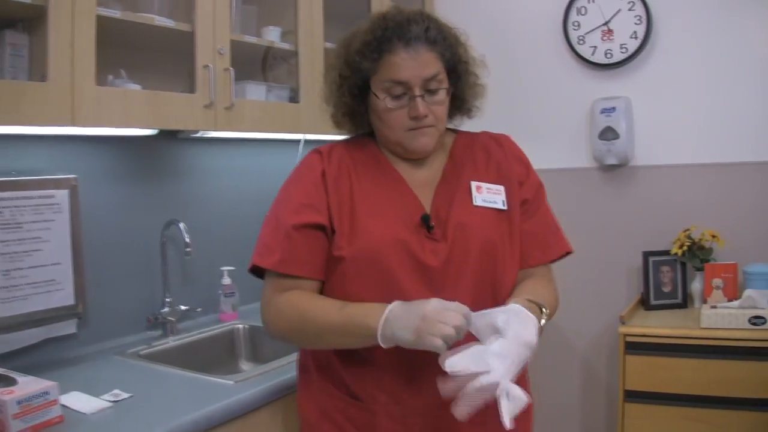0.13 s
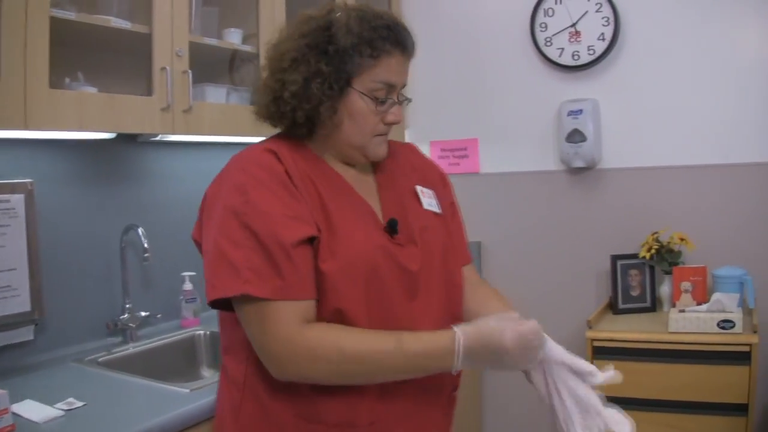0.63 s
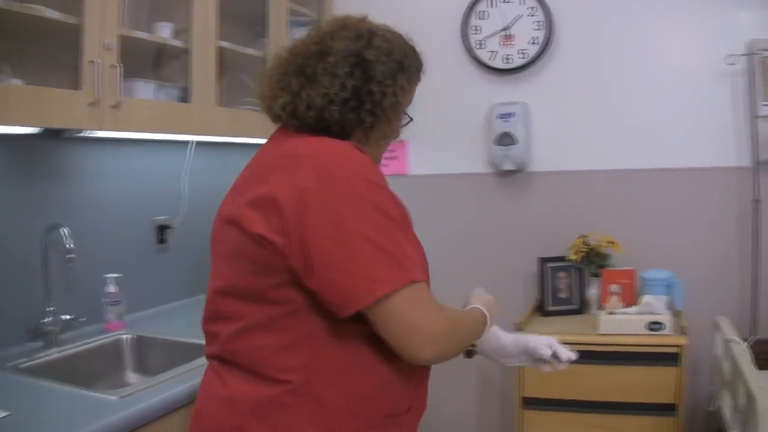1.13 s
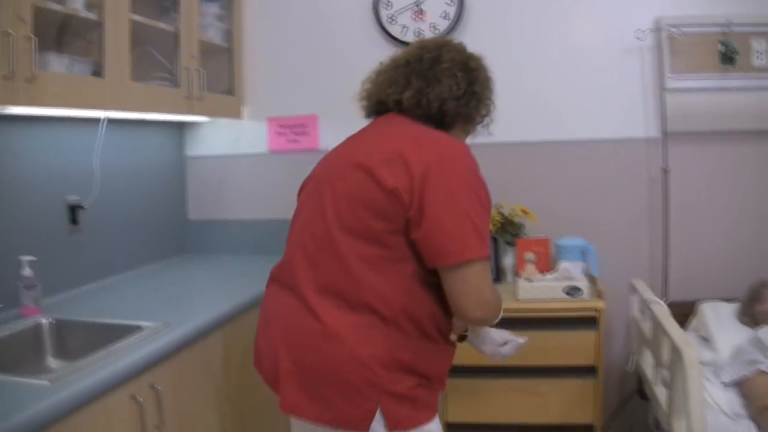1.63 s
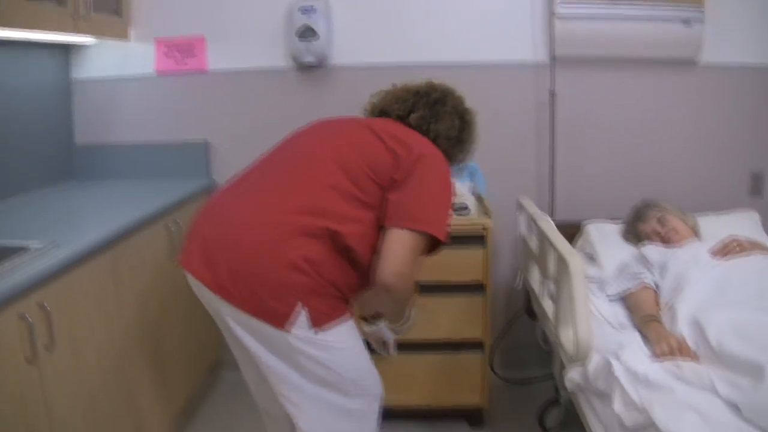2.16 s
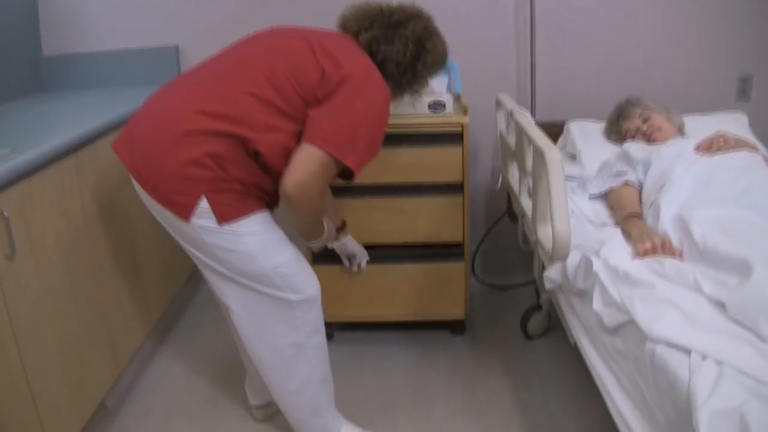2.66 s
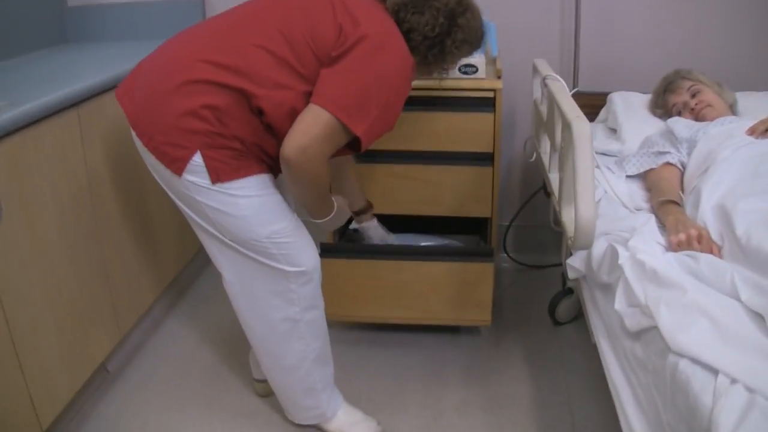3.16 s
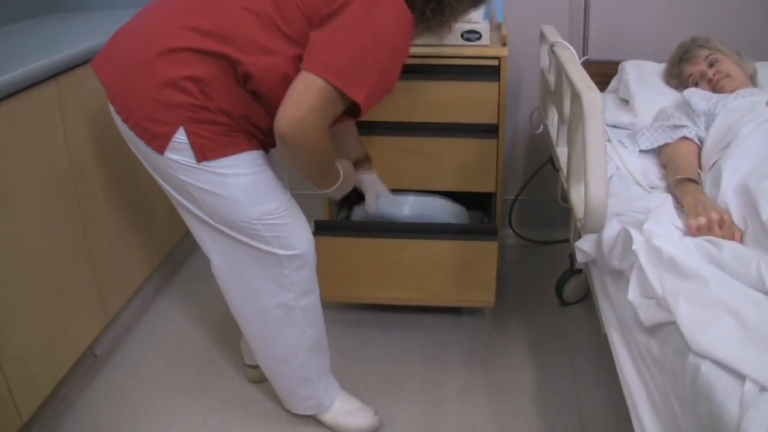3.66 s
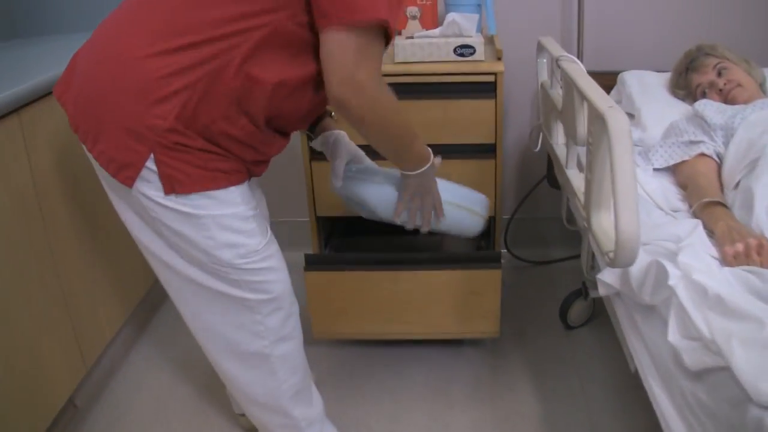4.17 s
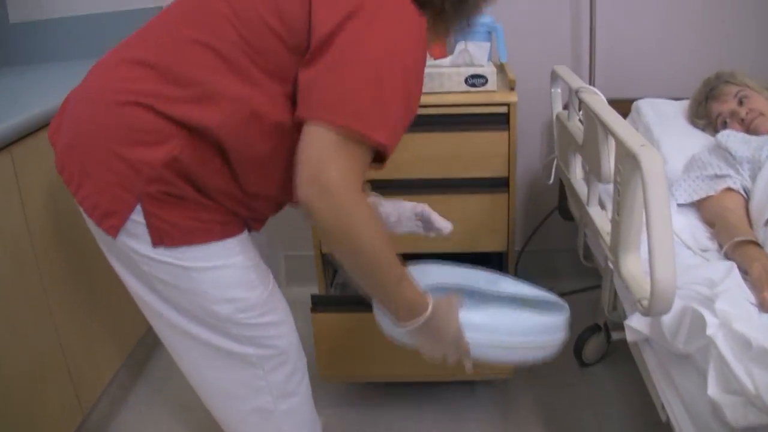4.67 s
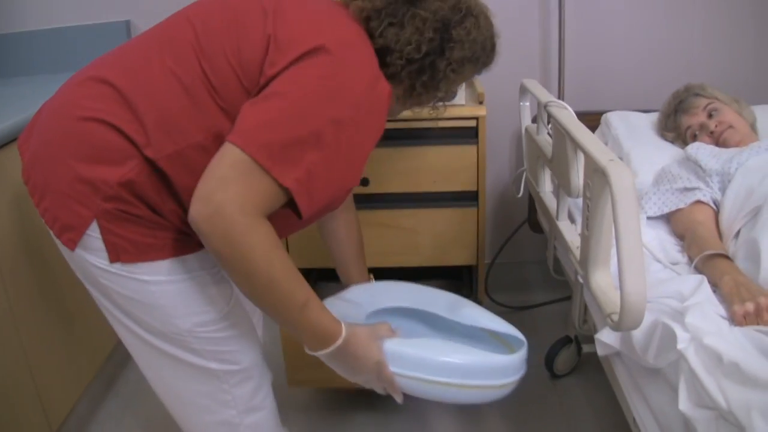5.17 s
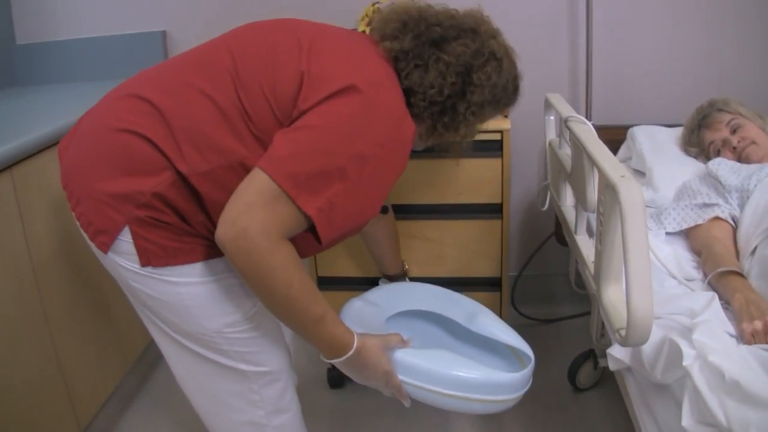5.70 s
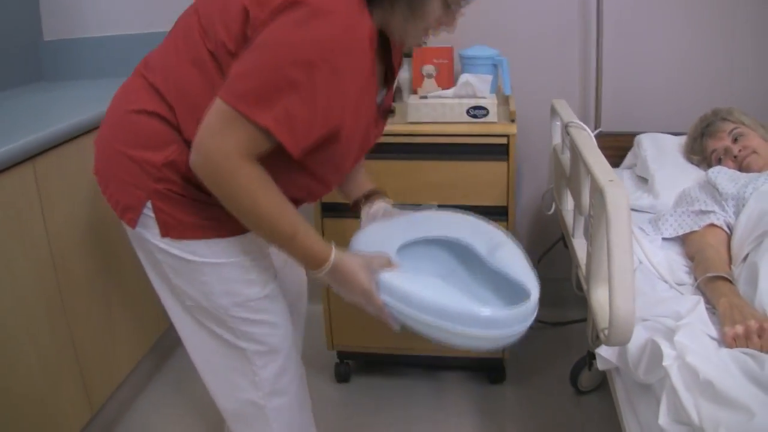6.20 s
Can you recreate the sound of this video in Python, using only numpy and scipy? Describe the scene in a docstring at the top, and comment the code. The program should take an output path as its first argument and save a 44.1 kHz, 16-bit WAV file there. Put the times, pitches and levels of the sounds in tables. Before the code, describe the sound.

Thin disposable gloves rustle, snap and flap; a wooden drawer rolls open with a clack, a plastic bedpan knocks hollowly, and the drawer bangs shut.

```python
"""Thin disposable gloves rustle, snap and flap over faint room air and preamp hiss; a wooden bedside drawer
then rolls open, a plastic bedpan knocks as it is lifted out, and the drawer is pushed shut in a small hard room.
Creases and runners are random clicks through filters; blows excite banks of decaying modes; snaps are clicks
with noise tails. Feedback delays form the room, and a clip-on microphone on the chest limits the bass."""
import sys
import numpy as np
from scipy import signal
from scipy.io import wavfile

SR = 44100
rng = np.random.default_rng(int(sys.argv[2]) if len(sys.argv) > 2 else 0)


def convert_level_to_amplitude(level_db):
    """Map a level in decibels to its linear amplitude factor."""
    exponent = np.asarray(level_db, float) / 20
    return 10 ** exponent


def to_wav(sig):
    """Store sig (one row per channel, or 1-D mono) as 16-bit WAV at the path in sys.argv[1].

    Samples outside -1..1 are clipped; the rate is SR.
    """
    pcm = np.clip(np.atleast_2d(sig), -1, 1) * 32767
    pcm = np.round(pcm).astype(np.int16)
    wavfile.write(sys.argv[1], SR, pcm.T)  # frames by channels


N = 278712

# Source levels below are nominal, ahead of the room and of later filters.
# Spectrum of the room air. Each row: frequency in Hz, relative level in dB per Hz.
AIR_SPECTRUM = [(18, -51), (30, -9.5), (53, -17.5), (199, -1), (328, -0.5), (461, -3), (2060, -16),
                (4650, -17.5), (8980, -27.5), (14800, -19.5), (16000, -44)]
AIR_RMS_DB, HISS_RMS_DB = -56.5, -62

# Weight shifts and the cabinet shake two low resonances.
# Each row: peak time in seconds, length in seconds, lower and upper resonance level in dB.
THUDS = [(0., 0.78, -73.5, -67), (1.7, 0.88, -71, -69), (2.56, 0.22, -59, -67), (2.723, 0.23, -56, -69),
         (4.308, 0.25, -64, -48.5), (5.13, 0.073, -57.5, -80), (5.33, 0.11, -56.5, -58.5),
         (5.777, 0.17, -47, -51), (6.05, 0.85, -75, -59)]
# The two low resonances. Each entry: frequency in Hz.
LOW_RESONANCES_HZ = [102, 148]
THUD_RISE_DB, THUD_FALL_DB = 132, 14   # level lost one length before and after the peak
THUD_STEADY = 1.9   # steady part relative to the waver

ROOM_T60_S, WALL_CUT_HZ, ROOM_DB = 0.43, 4300, -18

# Movements of gloved hands and cloth. Each row: peak time in seconds, length in seconds,
# rustle level in dB, fine crinkle level in dB, dull rub level in dB.
MOVES = [(0.0, 0.17, -51.5, -55, -53), (.339, 0.091, -54.5, -57, -54), (.43, 0.3, -58, -65, -57),
         (.6, 0.14, -53, -56.5, -55), (.76, 0.1, -51, -55, -71), (.86, 0.15, -49, -54, -47.5),
         (.95, 0.13, -49.5, -62, -46.5), (1.1, 0.13, -46.5, -53.5, -54), (1.17, .07, -55, -74, -49),
         (1.377, 0.11, -54, -60, -54.5), (1.5, 0.083, -65, -70, -48), (1.56, 0.11, -53.5, -60.5, -53.5),
         (1.715, 0.1, -53.5, -57, -48), (1.9, .2, -60.5, -61, -55), (2.06, 0.31, -69, -65.5, -51.5),
         (2.245, 0.074, -61.5, -62, -76), (2.8, 0.26, -52.5, -57.5, -61), (3.07, 0.12, -53.5, -61, -65),
         (3.3, 0.09, -68, -66, -56), (3.382, 0.052, -58.5, -67, -55), (3.547, 0.076, -58.5, -68, -50),
         (3.667, 0.18, -58, -67, -49), (3.86, 0.14, -58.5, -57.5, -54), (4.156, 0.13, -60.5, -61.5, -58),
         (4.28, 0.024, -68, -59, -70), (4.37, 0.2, -60, -64.5, -48.5), (4.649, 0.1, -58.5, -57, -60),
         (4.83, 0.34, -66, -66, -72), (5.088, 0.074, -86, -76, -58), (5.353, 0.19, -56, -64.5, -72),
         (5.85, 0.25, -55, -64, -58), (6.08, 0.18, -70, -66, -51.5), (6.2, 0.053, -53.5, -72, -50),
         (6.31, 0.11, -62, -58.5, -55)]
MOVE_RISE_DB, MOVE_FALL_DB = 17.5, 12.5   # level lost one length before and after the peak

# Snaps of glove film and small ticks. Each row: start in seconds, peak level in dB, centre in Hz,
# width in octaves, tail decay by 60 dB in seconds.
SNAPS = [(.328, -25.5, 2280, 3, 0.0023), (.381, -41.5, 595, 0.6, 0.012), (.396, -42, 1580, 0.46, 0.015),
         (.489, -36.5, 1730, 1.5, 0.018), (.573, -36.5, 1840, 0.92, 0.0052), (.838, -40, 630, 0.61, 0.013),
         (.882, -38, 332, 0.67, .03), (.867, -35.5, 1700, 0.67, 0.011), (.919, -35, 2500, 2.9, 0.013),
         (1.1625, -20.5, 1890, 1.1, 0.0082), (1.242, -37.5, 2600, 0.86, .01),
         (1.35, -40.5, 1280, 1.7, 0.014), (1.584, -35.5, 1190, 1.4, 0.0064),
         (1.703, -22.5, 1900, 2.3, 0.0027), (1.7045, -27, 6800, 0.88, 0.0073),
         (1.807, -40.5, 1490, 0.65, 0.0075), (2.054, -33.5, 890, 1.3, 0.018),
         (2.25, -40.5, 4270, 1.3, 0.034), (3.05, -41, 2500, 2, 0.062), (3.099, -41.5, 2500, 2.1, 0.024),
         (3.15, -39.5, 614, 0.28, 0.075), (3.183, -43, 1364, 0.48, 0.019), (3.389, -40, 1400, 0.36, 0.065),
         (3.668, -43, 2150, 1.2, 0.048), (3.83, -42, 3500, 0.76, 0.019), (3.841, -32.5, 4600, 1.4, 0.017),
         (3.86, -29, 3900, 1.2, 0.016), (3.884, -40.5, 3920, 1.5, 0.036), (3.927, -42, 3800, 1.8, 0.044),
         (4.635, -41, 2650, .3, 0.054), (3.545, -47.5, 2110, .6, .03), (4.833, -40, 5100, 1.3, 0.014),
         (5.086, -42.5, 3300, 2.4, 0.058), (5.695, -42, 1320, 0.3, 0.085),
         (6.199, -23.5, 7760, 1.04, 0.044), (6.2055, -31, 7200, 1.3, 0.026), (6.254, -38, 6940, 0.99, .004),
         (6.263, -34.5, 970, 2, 0.013), (6.2635, -39, 4900, 0.94, .005), (6.31, -46, 7100, 0.26, 0.011)]

# The glove cuff flaps against the wrist.
# Each row: start in seconds, peak level in dB, length of the strong flutter in seconds.
FLAPS = [(.919, -24.5, 0.0037), (1.0907, -18, 0.031), (2.052, -41, 0.0042)]
CUFF_HZ, CUFF_T60_S, TICK_HZ, TICK_T60_S = 380, 0.012, 1900, 0.0014
FLUTTER_S, LIMP_SLOWER, LIMP_DB = 0.0079, 1.35, -13   # slap spacing; the limp slaps' stretch and level
FIRST_TICK_DB, TICK_DB, TICK_SPREAD_DB = -19, -7.5, 1.5   # ticks relative to the low cycles

# An echo off the chest cancels a band while the wearer is upright.
CHEST_DIP_HZ, CHEST_DIP_Q, BENDS_AT_S = 3660, 5.3, 2.35

# A faint narrow hiss. Each row: peak time in seconds, length in seconds, level in dB.
SQUEAKS = [(5.55, 0.2, -67), (6.05, 0.28, -64.5)]
SQUEAK_HZ, SQUEAK_WIDTH_HZ = 2500, 280

# Bedpan bumping drawer and hands. Each row: start in seconds, peak level in dB, hardness from 0 to 1,
# centre of the push in Hz.
KNOCKS = [(3.355, -38.5, 0.03, 382), (3.374, -46, 0.06, 368), (3.492, -39, 0.07, 356),
          (3.514, -32.5, 0.11, 407), (3.535, -38.5, 0, 490), (3.55, -37.5, 0.08, 325),
          (3.572, -44, 0.36, 350), (4.279, -36, 0.67, 1190), (4.287, -34.5, 0.05, 208),
          (4.359, -28.5, 0.48, 1000), (4.612, -41.5, 0, 487), (4.628, -38, 0.5, 1150),
          (4.64, -34.5, 0.02, 400)]
# Modes of the hollow plastic. Each row: frequency in Hz, relative level in dB, decay by 60 dB in seconds.
BEDPAN_MODES = [(145.7, -25, .3), (178, -0.5, 0.16), (277, 9, 0.071), (338, 5, 0.14), (399.5, -0.5, 0.11),
                (478, -1, 0.079), (660, -3.5, 0.092), (853, -8, 0.09), (1110, 5.5, 0.03), (1430, 2, 0.095),
                (1700, -1.5, 0.04), (2620, -25, .05), (3280, -19, .05)]

# Drawer on its runners, one curve out and one in. Each row: time in seconds, level in dB.
ROLLS = [
    [(2.395, -71), (2.42, -46), (2.509, -67), (2.544, -46), (2.634, -43), (2.7, -36.5), (2.74, -38),
     (2.85, -40.5), (2.918, -34), (2.988, -41.5), (3.113, -52.5), (3.153, -50), (3.18, -80)],
    [(5.083, -64), (5.148, -48), (5.228, -59), (5.293, -43.5), (5.373, -37), (5.438, -44.5), (5.552, -54),
     (5.672, -49), (5.76, -48)],
]
# Blows on the drawer front. Each row: start in seconds, peak level in dB, hardness from 0 to 1,
# centre of the push in Hz.
JOLTS = [(2.408, -39.5, 0.01, 290), (2.537, -31, 0.38, 453), (2.7, -10, 0.68, 695), (2.708, -23.5, 1, 500),
         (2.72, -15, 0, 238), (2.761, -23.5, 0, 214), (2.432, -60, 0.5, 567), (2.915, -27.5, 0, 325),
         (2.965, -56, 0, 315)]
# Drawer meeting the cabinet. Each row: start in seconds, peak level in dB, hardness from 0 to 1,
# centre of the push in Hz.
SLAMS = [(5.277, -34, 0.05, 470), (5.321, -33.5, 0.46, 420), (5.371, -34.5, 0.15, 436),
         (5.757, -15.5, 0.42, 700), (5.763, -25, 0.8, 390), (5.774, -6.5, 0.84, 487),
         (5.78, -12.5, 0.25, 380), (5.8, -26, 0, 256)]
# Modes of the drawer. Each row: frequency in Hz, relative level in dB, undamped decay by 60 dB in seconds,
# which ring_share shortens.
DRAWER_MODES = [(215.7, 2.5, 0.48), (302.5, 0.5, 0.49), (522, 4.5, 0.16), (603, -3, 0.4), (776, 4, 0.14),
                (842, -7, 0.9), (897, 2, 0.095), (1110, -10.5, 0.48), (1230, 4.5, 0.039), (1360, -32, 0.26),
                (1750, -36, 0.095), (2280, -29, 0.12)]
# Modes of the cabinet. Each row: frequency in Hz, relative level in dB, undamped decay by 60 dB in seconds,
# which ring_share shortens.
CABINET_MODES = [(222.5, -9, 0.5), (277, -14.5, 0.56), (331.4, -16, 0.16), (426, -9, 0.11),
                 (474.5, -2, 0.14), (617, -11.5, 0.12), (670, -20, 0.3), (737, -14.5, 0.21),
                 (867, -15, 0.12), (1080, -14.5, 0.095), (1410, -14.5, 0.1), (1630, -5.5, 0.046),
                 (1628, -15.5, 0.17), (2600, -36, 0.18)]
# Air in the shut cabinet hums on. Each row: frequency in Hz, relative level in dB,
# undamped decay by 60 dB in seconds, which ring_share shortens.
CABINET_AIR_MODES = [(233, -31.5, 2.96), (322, -35, 2.9)]
RUNNER_SCRAPE_DB = -20.5   # treble of the runners relative to their rumble
RATTLE_TOUCH_S, RATTLE_UNEVEN_DB = 0.00397, 4   # spacing and unevenness of the touches of loose parts
BLOW_DETUNE = 0.011   # loose panels: typical share by which each blow shifts a mode

MIC_BASS_CUT_HZ = 140
# The coupling capacitors differ a little. Each entry: bass cut in Hz, left then right.
INPUT_CUT_HZ = [34, 10.5]


def rms_one(x):
    """Normalisation: division by the root mean square gives unit power."""
    return x / np.sqrt(np.mean(x ** 2) + 1e-20)


def in_time(rows):
    """Linear interpolation gives a curve's columns at every sample, silent outside its span."""
    s, *columns = np.transpose(rows)
    return [np.interp(np.arange(N) / SR, s, c, left=-120, right=-120) for c in columns]


def band(x, low_hz, high_hz):
    """Band limitation by a Butterworth filter, maximally flat in its passband."""
    sos = signal.butter(2, [low_hz, min(high_hz, .45 * SR)], "band", fs=SR, output="sos")
    return signal.sosfilt(sos, x)


def ring(clicks, hz, t60):
    """Damped resonance: a unit click excites a decaying sine of initial amplitude 1."""
    radius, angle = convert_level_to_amplitude(-60 / (t60 * SR)), 2 * np.pi * hz / SR
    feedback = [1, -2 * radius * np.cos(angle), radius * radius]
    return signal.lfilter([0, np.sin(angle)], feedback, clicks + 1e-18)


def drift(rate_hz):
    """Low-passed noise: two equal poles leave a slow random wander of unit rms."""
    pole = np.exp(-80 * np.pi * rate_hz / SR)   # runs on every 40th sample
    noise = rng.standard_normal(N // 40 + 2002)
    slow = signal.lfilter([1], [1, -2 * pole, pole * pole], noise)[2000:]
    return np.interp(np.arange(N) / 40, np.arange(len(slow)), rms_one(slow))


def grains(per_s, spread_db):
    """Impulsive random process: independent clicks, mostly small, now and then large."""
    sizes = convert_level_to_amplitude(spread_db * np.minimum(rng.exponential(1, N), 5)) * rng.choice([-1, 1], N)
    return sizes * (rng.random(N) < per_s / SR)


def swells(rows, rise_db, fall_db):
    """Incoherent addition: each row rises to its peak and falls away, and the powers add."""
    power, t = 0, np.arange(0, N + 40, 40) / SR
    for s, length, *db in rows:
        late = (t - s) / length
        slope_db = np.where(late < 0, rise_db * late, -fall_db * late)
        power = power + convert_level_to_amplitude(np.array(db)[:, None] + slope_db) ** 2
    return [np.interp(np.arange(N) / SR, t, np.sqrt(p)) for p in power]


def place(rows, shape):
    """Superposition: one short sound per row, scaled to its peak and added from its start."""
    out = np.zeros(N + SR)
    for s, peak_db, *rest in rows:
        sound = shape(*rest)
        at = round(s * SR)
        out[at:at + len(sound)] += convert_level_to_amplitude(peak_db) * sound / np.max(np.abs(sound))
    return out[:N]


def dying_noise(t60, size):
    """Exponential decay: white noise falls 60 dB in t60."""
    return rng.standard_normal(size) * convert_level_to_amplitude(-60 * np.arange(size) / SR / t60)


def clatter(t60, size):
    """Intermittent contact: decaying noise is broken into uneven touches."""
    steps = np.arange(size) / SR / RATTLE_TOUCH_S
    uneven = np.interp(steps, np.arange(size), rng.standard_normal(size))
    return dying_noise(t60, size) * convert_level_to_amplitude(RATTLE_UNEVEN_DB * uneven)


def preamp_hiss(shape):
    """Amplifier noise: white and independent in each channel."""
    return convert_level_to_amplitude(HISS_RMS_DB) * rng.standard_normal(shape)


def air():
    """Broadband noise of ventilation and far sources, in half-octave bands that flicker a little."""
    out, white = 0, rng.standard_normal((2, N))
    edges = 25 * 2 ** np.arange(0, 9.6, .5)
    hz, db = np.transpose(AIR_SPECTRUM)
    for k, (low, high) in enumerate(zip(edges, edges[1:])):
        level_db = np.interp(np.log(low * high) / 2, np.log(hz), db)
        flicker_db = 1.0 * drift(26.0)
        out = out + convert_level_to_amplitude(level_db + flicker_db) * band(white[k % 2], low, high)   # neighbours differ
    return convert_level_to_amplitude(AIR_RMS_DB) * rms_one(out)


def thuds():
    """Narrow-band resonance: slow complex modulation makes each low tone waver about its pitch."""
    out = 0
    for gain, hz in zip(swells(THUDS, THUD_RISE_DB, THUD_FALL_DB), LOW_RESONANCES_HZ):
        waver = THUD_STEADY + drift(5) + 1j * drift(5)
        tone = np.real(waver * np.exp(2j * np.pi * hz * np.arange(N) / SR))
        out = out + gain * rms_one(tone)
    return out


def room(x):
    """Reverberation by repeated reflection: ten feedback delays lose level and treble on every round."""
    out, dull = np.zeros(N), np.exp(-2 * np.pi * WALL_CUT_HZ / SR)
    lags = (rng.uniform(.011, 0.047, 10) * SR).astype(int)
    for k, lag in enumerate(lags):
        loop, gain, state = x.copy(), convert_level_to_amplitude(-60 * lag / SR / ROOM_T60_S), [0.]
        for i in range(lag, N, lag):   # one round trip at a time
            back, state = signal.lfilter([gain * (1 - dull)], [1, -dull], loop[i - lag:i], zi=state)
            loop[i:i + lag] += back[:N - i]
        out += (loop - x) * (-1) ** k
    return convert_level_to_amplitude(ROOM_DB) * out


def chest(x):
    """Interference: sounds from hands held in front lose one band until the wearer bends down."""
    dipped = signal.lfilter(*signal.iirnotch(CHEST_DIP_HZ, CHEST_DIP_Q, fs=SR), x)
    return np.where(np.arange(N) / SR < BENDS_AT_S, dipped, x)


def rustle():
    """Stick-slip friction: creases slip in clumps as rustle and crinkle; skin and cloth rub dully."""
    rustle_gain, crinkle_gain, rub_gain = swells(MOVES, MOVE_RISE_DB, MOVE_FALL_DB)
    slips = grains(1500 * convert_level_to_amplitude(3.5 * drift(35.0)), spread_db=1.5)
    crinkle = band(band(slips, 3420, 6120), 6300, 20000)
    rub_grains = band(grains(600., spread_db=2.0), 194, 662)
    rub = rub_grains * convert_level_to_amplitude(3.2 * np.clip(drift(25.4), -2, 1.5))
    out = rub_gain * rms_one(rub)
    out += rustle_gain * rms_one(band(slips, 610, 2550))
    return out + crinkle_gain * rms_one(crinkle)


def snaps():
    """Sudden release of a crease: one sharp click, then a fizzing tail that is stronger the longer it lasts."""
    def snap(hz, octaves, t60):
        burst = t60 / 0.1 * dying_noise(max(t60, .002), size=4000)
        burst[0] = 1
        spread = 2 ** (max(octaves, .1) / 2)
        low_hz, high_hz = hz / spread, hz * spread
        return band(band(burst, low_hz, high_hz), low_hz / 1.9, high_hz * 0.76)
    return place(SNAPS, snap)


def flaps():
    """Trapped-air resonance: a cuff slap gives a few low cycles and a tick; as many limp slaps follow."""
    push = np.r_[np.hanning(24), np.zeros(3000)]

    def flap(tick_db):
        low = ring(push, CUFF_HZ, CUFF_T60_S)
        tick = ring(np.gradient(push), TICK_HZ, TICK_T60_S)
        return low / low.max() + convert_level_to_amplitude(tick_db) * tick / tick.max()

    slaps = []
    for s, db, length in FLAPS:
        for after in np.arange(0, length, FLUTTER_S):
            tick_db = TICK_DB + TICK_SPREAD_DB * rng.normal() if after else FIRST_TICK_DB   # lands soft
            slaps.append((s + after, db + rng.normal(), tick_db))
            limp_at = s + length + FLUTTER_S + LIMP_SLOWER * after
            slaps.append((limp_at, db + LIMP_DB + rng.normal(), TICK_DB + LIMP_DB))
    return band(place(slaps, flap), 270, 6000)   # too small a pocket to push deep bass


def squeak():
    """Narrow-band noise: white noise through one slim filter is heard as a faint pitched hiss."""
    gain, = swells(SQUEAKS, rise_db=12., fall_db=10.0)
    half_width_hz = SQUEAK_WIDTH_HZ / 2
    noise = band(rng.standard_normal(N), SQUEAK_HZ - half_width_hz, SQUEAK_HZ + half_width_hz)
    return gain * rms_one(noise)


def body(force, modes, ring_share):
    """Modal superposition: one force drives every mode, neighbours in opposite sign."""
    out = 0
    for k, (hz, db, t60) in enumerate(modes):
        out = out + (-1) ** k * convert_level_to_amplitude(db) * ring(force, hz, ring_share * t60)
    return out


def blows(rows, modes, ring_share, rattle_db, rattle_t60, crack_db, crack_t60):
    """Impact excitation: push and rattle ring modes near their centre; a harder blow reaches wider and cracks."""
    def blow(hardness, hz):
        force = convert_level_to_amplitude(rattle_db) * clatter(rattle_t60, size=SR // 2)
        force[0] = 1
        spread = 1.1 + 5.4 * np.clip(hardness, 0, 1)
        shifted = [(f * (1 + BLOW_DETUNE * rng.normal()), db, t60) for f, db, t60 in modes]
        rings = body(band(force, hz / spread, hz * spread), shifted, ring_share)
        buzz = convert_level_to_amplitude(-7.5) * band(clatter(0.2, size=SR // 2), 360, 5800)   # panels buzz on, duller
        crack = band(dying_noise(crack_t60, size=SR // 2) + buzz, 830, 3800)
        crack_height = hardness * convert_level_to_amplitude(crack_db) / np.max(np.abs(crack))
        return rings / np.max(np.abs(rings)) + crack_height * crack
    return place(rows, blow)


def bedpan():
    """Damped shell vibration: knocks ring hollow plastic, dull and short."""
    return blows(KNOCKS, BEDPAN_MODES, ring_share=1.0, rattle_db=-26.0, rattle_t60=0.082,
                 crack_db=0.0, crack_t60=0.061)


def drawer():
    """Rolling and impact excitation: rollers rumble through the wood and scrape; jolts and the slam strike it."""
    out = blows(JOLTS, DRAWER_MODES, ring_share=0.22, rattle_db=-28., rattle_t60=0.18,
                crack_db=-3.5, crack_t60=0.092)
    out += blows(SLAMS, CABINET_MODES + CABINET_AIR_MODES, ring_share=0.48, rattle_db=-23.0, rattle_t60=0.14,
                 crack_db=-3.0, crack_t60=0.051)
    for roll, modes in zip(ROLLS, [DRAWER_MODES, CABINET_MODES]):
        bumps = grains(250 * convert_level_to_amplitude(3.5 * drift(25.0)), spread_db=2.2)
        rumble = rms_one(body(band(bumps, 254, 686), modes, ring_share=0.15))
        scrape = convert_level_to_amplitude(RUNNER_SCRAPE_DB) * rms_one(band(bumps, 700, 2970))
        out += convert_level_to_amplitude(in_time(roll)[0]) * (rumble + scrape)
    return out


def scene():
    """Superposition at one microphone with a bass cut: both channels carry the same sound."""
    furniture = drawer() + squeak() + bedpan()
    hands = snaps() + flaps()
    reverberation = room(furniture + convert_level_to_amplitude(-7) * hands)
    near = furniture + chest(hands + rustle()) + reverberation
    near = signal.sosfilt(signal.butter(4, MIC_BASS_CUT_HZ, "high", fs=SR, output="sos"), near)
    mono = near + thuds() + air()
    return np.array([mono, mono])


def top_cut(x):
    """Nothing passes above the cut-off."""
    return signal.sosfilt(signal.butter(12, 16620, fs=SR, output="sos"), x)


def record(dry):
    """Capacitive coupling: each channel has its own first-order bass cut, then its own hiss."""
    cut = [signal.lfilter(*signal.butter(1, hz, "high", fs=SR), x) for hz, x in zip(INPUT_CUT_HZ, dry)]
    mix = np.array(cut) + preamp_hiss(dry.shape)
    return top_cut(mix)


dry = scene()
out = record(dry)
to_wav(out)
```